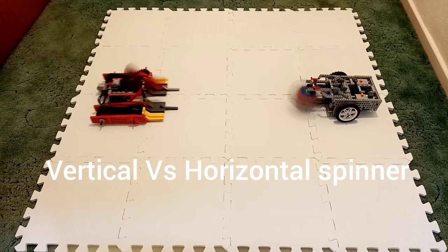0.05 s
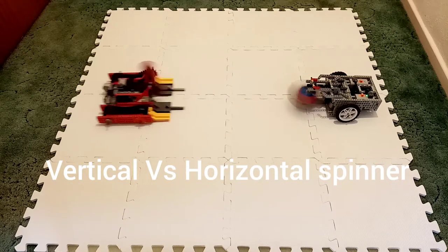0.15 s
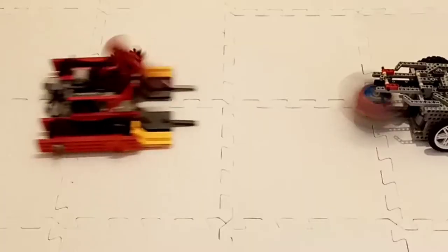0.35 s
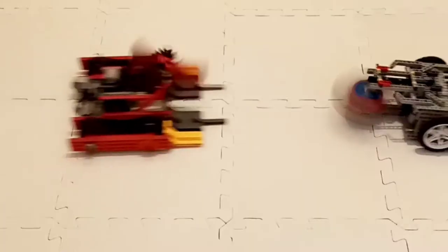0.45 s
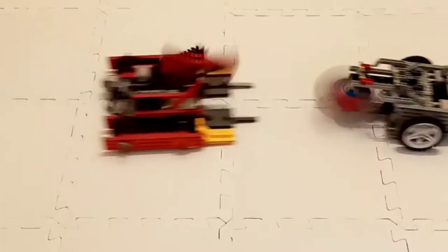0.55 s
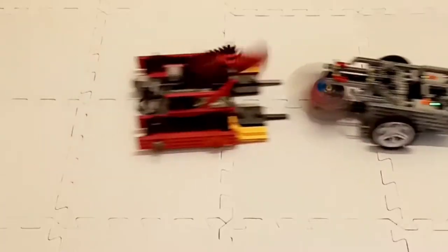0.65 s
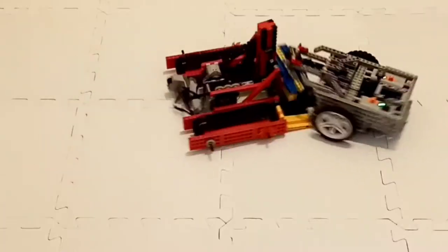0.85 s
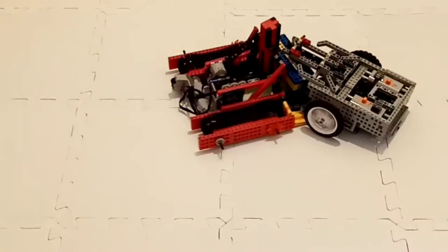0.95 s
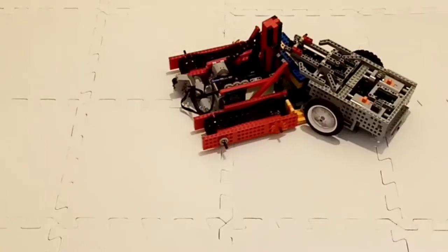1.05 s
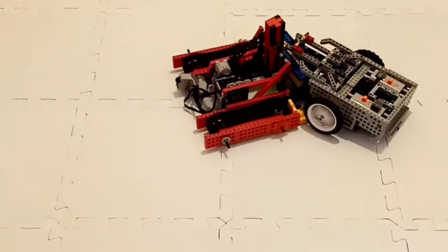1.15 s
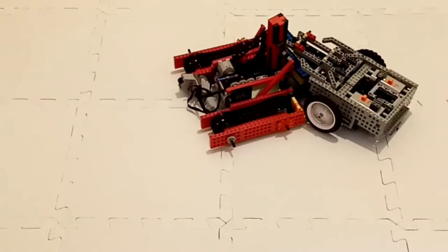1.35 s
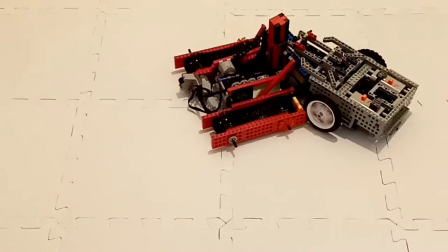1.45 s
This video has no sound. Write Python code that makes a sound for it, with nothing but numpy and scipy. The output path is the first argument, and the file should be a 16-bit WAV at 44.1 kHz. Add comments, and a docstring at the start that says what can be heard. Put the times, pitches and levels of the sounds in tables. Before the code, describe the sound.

A loud clattering crash of motorized toy brick robots, between gear whirring and faint grinding.

```python
"""Toy robots colliding

Two robots of plastic bricks race at each other over a foam mat in a small room. Gear teeth strike in
rapid trains, heard as a whirr that an unbalanced spinner modulates. At the crash, loose bricks rattle
and ring and the spinners jam; the gears grind on weakly until another knock. The phone's limiter
ducks just ahead of the crash, and its right microphone is the brighter one."""
import sys
import numpy as np
from scipy import signal
from scipy.fft import rfft, irfft
from scipy.io import wavfile
from scipy.ndimage import uniform_filter1d, minimum_filter1d

SR = 44100
rng = np.random.default_rng(int(sys.argv[2]) if len(sys.argv) > 2 else 0)


def inscribe(sig):
    """Save sig as 16-bit PCM at rate SR to the path in sys.argv[1].

    A 1-D sig is mono; a 2-D sig holds one channel per row.
    Samples are clipped to [-1, 1] before scaling.
    """
    pcm = np.round(np.clip(np.atleast_2d(sig).T, -1, 1) * 32767)
    wavfile.write(sys.argv[1], SR, pcm.astype(np.int16))


N = 66150
TIME = np.arange(N) / SR
JAM_S = .714  # the spinners jam

def undb(db):
    """Amplitude ratio of a level in decibels."""
    return 10 ** (np.asarray(db) / 20)

def unit(x):
    """Normalisation to an rms of 1."""
    return x / np.sqrt(np.mean(x ** 2))

def envelope(rows):
    """Gain interpolated through (s, dB) points."""
    return undb(np.interp(TIME, *np.array(rows).T))

def colour(x, points, size=4096):
    """Minimum-phase filtering through (Hz, dB) points, with unit power gain."""
    hz, db = np.array(points).T
    f = np.maximum(np.fft.rfftfreq(size, 1 / SR), 1)
    cepstrum = irfft(np.log(undb(np.interp(np.log(f), np.log(hz), db))))
    cepstrum[1:size // 2] *= 2
    cepstrum[size // 2 + 1:] = 0
    impulse = irfft(np.exp(rfft(cepstrum)))
    return signal.fftconvolve(x, impulse / np.linalg.norm(impulse))[:N]

def drift(per_s):
    """Slow random fluctuation with an rms of 1."""
    hold = int(SR / per_s)
    steps = np.repeat(rng.standard_normal(N // hold + 1), hold)
    return unit(uniform_filter1d(steps, hold)[:N])

def clicks(per_s, scatter_db):
    """Shot noise: impulses of random time, sign and size."""
    impulses = (rng.random(N) < per_s / SR) * rng.choice([-1, 1], N)
    return unit(impulses * undb(scatter_db * np.clip(rng.standard_normal(N), -2, 2)))

def teeth(hz, wander=.006, jitter_s=.00006, scatter_db=6):
    """Gear meshing: one impulse per tooth, uneven in time and size."""
    passed = np.cumsum(hz * (1 + wander * drift(6))) / SR
    contacts = np.flatnonzero(np.diff(np.floor(passed)))
    late, size = rng.standard_normal((2, N))[:, contacts]
    contacts += np.round(late * jitter_s * SR).astype(int)
    train = np.zeros(N)
    train[np.clip(contacts, 0, N - 1)] = undb(scatter_db * size)
    return unit(train - train.mean())

def echoes(t60_1khz_s=.31, t60_10khz_s=.21, build_s=.0019):
    """Diffuse reverberation: a noise tail whose treble decays sooner."""
    t = np.arange(32768) / SR
    noise, f = rfft(rng.standard_normal(len(t))), np.fft.rfftfreq(len(t), 1 / SR)
    octaves_hz = 1000 * 2. ** np.arange(5)
    tail = 0
    for hz, pick in zip(octaves_hz, np.eye(5)):
        t60 = t60_1khz_s * (t60_10khz_s / t60_1khz_s) ** np.log10(hz / 1000)
        band = irfft(noise * np.interp(f, octaves_hz, pick))
        tail += band * undb(-60 * t / t60)
    tail *= 1 - np.exp(-t / build_s)
    return tail / np.linalg.norm(tail)

def room(x, lag_s, paths=7, change_s=.003, reverb_db=7):
    """Multipath propagation: clicks from all over the moving robots take turns among echo paths."""
    reverb = 0
    for k in range(paths):
        away = np.abs((TIME / change_s - k + paths / 2) % paths - paths / 2)
        share = np.cos(np.pi / 2 * np.minimum(away, 1))
        reverb += signal.fftconvolve(x * share, echoes())[:N]
    direct = np.pad(x, (int(lag_s * SR), 0))[:N]
    return (direct + undb(reverb_db) * reverb) / np.hypot(1, undb(reverb_db))

# Modes of the bricks. Each row: frequency in Hz, relative level in dB, 60 dB decay time in seconds.
BRICK_MODES = [(1550, -41, 0.036), (4000, -37, .025), (4117, 15, 0.071), (4387, 15, 0.022), (5760, -3, .03),
               (6690, -14, 0.021), (6750, 19, 0.013), (7530, 10, 0.0089), (9180, 7, 0.027)]
def bricks(x, ring_db):
    """Modal resonance: each click is heard along with the damped ringing it excites in the plastic."""
    t = np.arange(SR // 8) / SR
    modes = sum(undb(db) / np.sqrt(t60) * np.sin(2 * np.pi * hz * t) * undb(-60 * t / t60)
                for hz, db, t60 in BRICK_MODES)
    ring = signal.fftconvolve(x, modes / np.linalg.norm(modes))[:N]
    return (x + undb(ring_db) * ring) / np.hypot(1, undb(ring_db))

# Effort of the motors. Each row: time in seconds, level in dB.
STRAIN_LEVELS = [(.94, -53.5), (1.0, -67), (1.05, -51.5), (1.10, -66.5), (1.15, -51), (1.21, -63.5),
                 (1.25, -111), (1.34, -70), (1.38, -71), (1.45, -76)]
# Response of the chassis. Each row: frequency in Hz, relative gain in dB.
CHASSIS_RESPONSE = [(80, -12), (200, -3), (330, 10), (420, 2.5), (560, -18), (740, 6.5), (1030, 4.5),
                    (1350, 0), (3000, -12), (9000, -35)]
def straining_motors(tooth_hz=78.6):
    """Forced vibration: the stalling motors groan through the chassis, tooth by uneven tooth."""
    push = unit(teeth(tooth_hz * (1 + .14 * drift(12))) + clicks(1200, 1.1))
    return colour(push * envelope(STRAIN_LEVELS) * (TIME > JAM_S), CHASSIS_RESPONSE)

# Surges of the jammed gears. Each row: time in seconds, relative level in dB.
GRIND_LEVELS = [(0.96, -52.5), (0.982, -49.5), (1.058, -49.5), (1.11, -54.5), (1.198, -48), (1.214, -56),
                (1.244, -51.5), (1.31, -58), (1.364, -51), (1.462, -57), (1.47, -48.5)]
# Spectrum of the scraping. Each row: frequency in Hz, relative level in dB.
GRIND_SPECTRUM = [(80, -16.5), (180, 0), (350, -7.5), (600, -13.5), (1000, -5.5), (1600, -6.5), (2600, 0),
                  (4500, -3.5), (6300, 3), (8000, -4.5), (11000, -6.5), (16000, -5)]
def grinding_gears(gain_db=2):
    """Friction noise: the locked robots push on, and their gears slip and scrape."""
    slips = clicks(1500, 4.8) * envelope(GRIND_LEVELS) * (TIME > JAM_S)
    return undb(gain_db) * colour(bricks(slips, ring_db=-19.5), GRIND_SPECTRUM)

# Rumble of the wheels as they gather speed. Each row: time in seconds, level in dB.
RUMBLE_LEVELS = [(.19, -46.5), (.3, -44), (.6, -41.5), (.7, -51.5)]
# Response of the foam mat. Each row: frequency in Hz, relative gain in dB.
MAT_RESPONSE = [(25, -24), (50, -39), (85, -7), (125, -8), (175, 2.5), (240, 1), (320, 4), (410, -3),
                (490, -10.5), (900, -4), (3000, -35)]
def rolling_wheels():
    """Rolling noise: the mat filters many small contacts into a rumble."""
    return colour(clicks(900, 4.2), MAT_RESPONSE) * envelope(RUMBLE_LEVELS)

def burst(start_s, db, decay_s):
    """Exponential decay from a sudden onset."""
    return undb(db) * (TIME >= start_s) * np.exp(-np.abs(TIME - start_s) / decay_s)

# Bounces of the chassis. Each row: start in seconds, level in dB.
BOUNCES = [(0.721, -34.5), (.785, -35.5), (1.373, -59)]
def chassis_thuds(decay_s=.057):
    """Cushioned impact: the chassis bounce on the mat, which passes mainly low frequencies."""
    force = sum(burst(start_s, db, decay_s) for start_s, db in BOUNCES)
    return colour(force * clicks(4000, 2.2), MAT_RESPONSE)

# Meshing gears. Each row: tooth rate in Hz, relative level in dB.
GEAR_MESHES = [(120.5, -25), (179, 2), (220, -2), (398, -5.5), (1031, -33)]
# Course of the whirr. Each row: time in seconds, relative level in dB.
WHIRR_LEVELS = [(0.2, -37.5), (0.45, -33), (0.58, -35.5), (0.614, -30.5), (0.638, -38.5), (0.69, -32)]
# Spectrum of the whirr. Each row: frequency in Hz, relative level in dB.
WHIRR_SPECTRUM = [(80, -35.5), (180, 9), (400, -14.5), (640, -5), (830, 1), (1100, 1.5), (1450, -3.5),
                  (2500, -3), (4500, -1), (5600, -0.5), (6600, 2), (8000, -3.5), (9300, 0.5), (11000, -3.5),
                  (16000, -0.5)]
def running_gears(spin_hz=9.7, spin_depth=.12, axle_db=.5, gain_db=3):
    """Amplitude modulation: an unbalanced spinner sways the clatter of teeth and loose axles."""
    mesh = unit(sum(undb(db) * teeth(hz) for hz, db in GEAR_MESHES))
    clatter = unit(mesh + undb(axle_db) * clicks(2500, 4.5))
    wobble = 1 + spin_depth * np.sin(2 * np.pi * spin_hz * TIME)
    whirr = colour(bricks(clatter * wobble, ring_db=-23.5), WHIRR_SPECTRUM)
    return whirr * envelope(WHIRR_LEVELS) * undb(gain_db)

# Blows of brick on brick. Each row: start in seconds, level in dB, decay time constant in seconds.
BRICK_BLOWS = [(.7134, 3, .0016), (.7175, 3, .0008), (.7198, -6, .02), (.7776, -10, .001),
               (.7570, -14, .035), (1.0135, -45, .008), (1.0435, -36, .014), (1.4815, -42, .003),
               (1.4865, -32, .015)]
# Spectrum of the rattle. Each row: frequency in Hz, relative level in dB.
RATTLE_SPECTRUM = [(80, -20), (300, -6), (550, -5.5), (1000, -1.5), (1500, 1), (2200, 1), (4000, 2.5),
                   (6300, 4), (9000, 2.5), (11000, 1), (16000, 4.5)]
def crash():
    """Impact excitation: each blow sets off a dying rattle of bricks."""
    force = sum(burst(*blow) for blow in BRICK_BLOWS)
    rattle = force * clicks(per_s=12000, scatter_db=2.5)
    return colour(bricks(rattle, ring_db=-11.5), RATTLE_SPECTRUM)

def scene(jam_decay_s=.011, shared_bass_hz=138):
    """Superposition: all sources reach two microphones through the room, sharing the deep bass."""
    until_jam = np.exp(-np.maximum(TIME - JAM_S, 0) / jam_decay_s)
    race = (running_gears() + rolling_wheels()) * until_jam
    robots = race + crash() + chassis_thuds() + grinding_gears() + straining_motors()
    left, right = room(robots, lag_s=0), room(robots, lag_s=.00088)
    f = np.fft.rfftfreq(N, 1 / SR)
    side = irfft(rfft(left - right) * f / np.hypot(f, shared_bass_hz), N)
    return np.array([left + right + side, left + right - side]) / 2

def limiter(x, limit_db=-18.5, ahead_s=.014, ramp_s=.013, recover_db_per_s=72):
    """Look-ahead limiting: the gain drops before a loud sound and recovers steadily."""
    power = uniform_filter1d(np.mean(x ** 2, axis=0), size=SR // 200)
    gain_db = np.minimum(limit_db - 10 * np.log10(np.maximum(power, 1e-12)), 0)
    gain_db = minimum_filter1d(gain_db, 2 * int(ahead_s * SR) + 1)
    climb_db = recover_db_per_s * TIME
    gain_db = np.minimum.accumulate(gain_db - climb_db) + climb_db
    return x * undb(uniform_filter1d(gain_db, int(ramp_s * SR)))

# Response of the microphones. Each row: frequency in Hz, left gain in dB, right gain in dB.
MIC_RESPONSE = [(98, -13, -10.5), (370, -5.5, 0), (2460, -4, 0), (5600, -3.5, 1), (7220, -6, 4.5),
                (9420, -1.5, 0), (10100, -5, -2), (11900, -26.5, -6), (14000, -28, -5.5), (14830, -20, 4),
                (16000, -19, 4.5)]
def record(dry, low_cut_hz=68, top_hz=15480, start_s=.189):
    """Band-limited pickup: the sound is coloured by the microphones, limited, and cuts in abruptly."""
    hz, left_db, right_db = np.array(MIC_RESPONSE).T
    f = np.fft.rfftfreq(2 * N, 1 / SR)
    mics = undb([np.interp(f, hz, left_db), np.interp(f, hz, right_db)])
    low_cut = f ** 2 / np.hypot(f ** 2, low_cut_hz ** 2)
    picked_up = irfft(rfft(dry, 2 * N) * mics * low_cut)[:, :N]
    heard = limiter(picked_up) * (TIME > start_s)
    return signal.sosfilt(signal.ellip(10, .2, 70, top_hz, fs=SR, output="sos"), heard)

dry = scene()
out = record(dry)
inscribe(out)
```